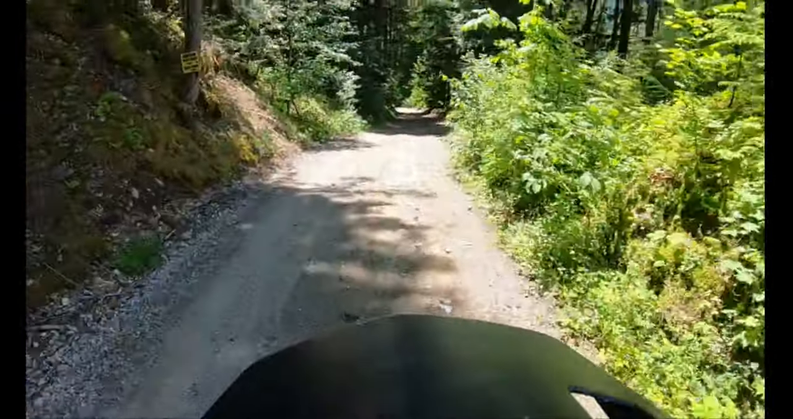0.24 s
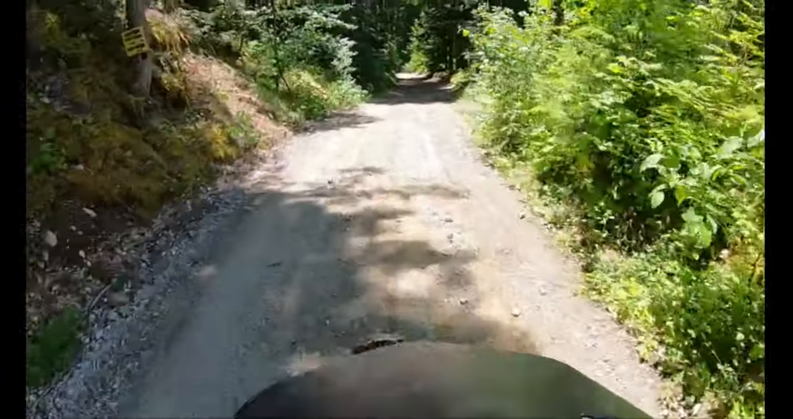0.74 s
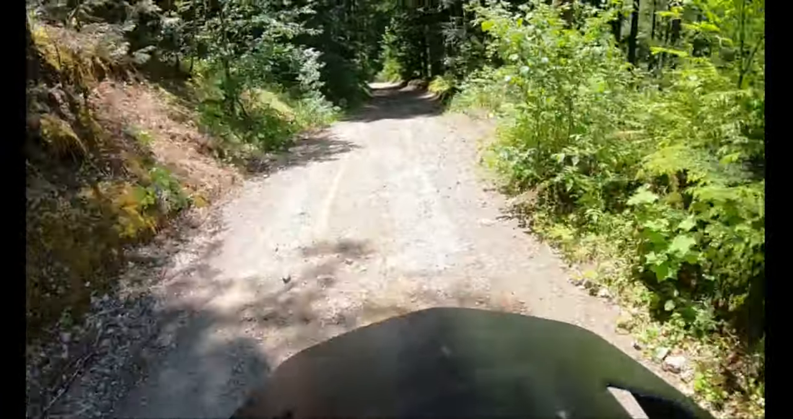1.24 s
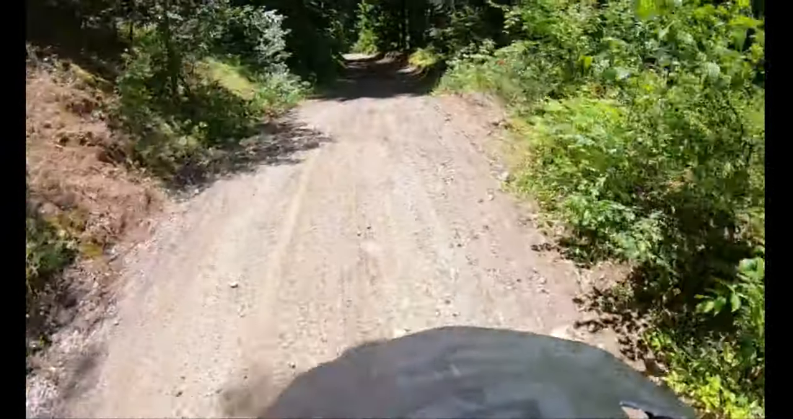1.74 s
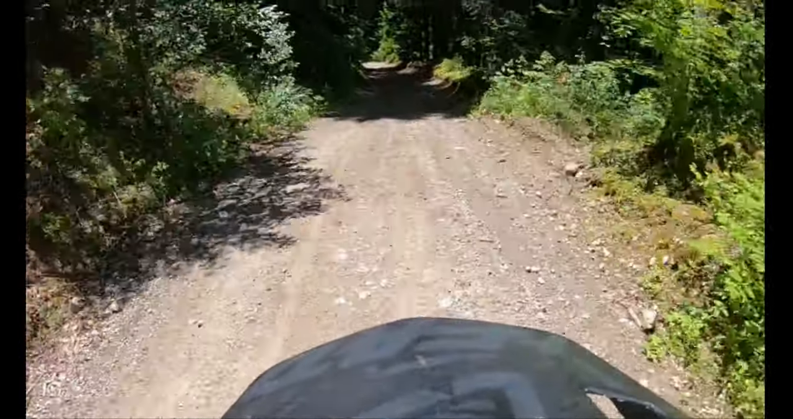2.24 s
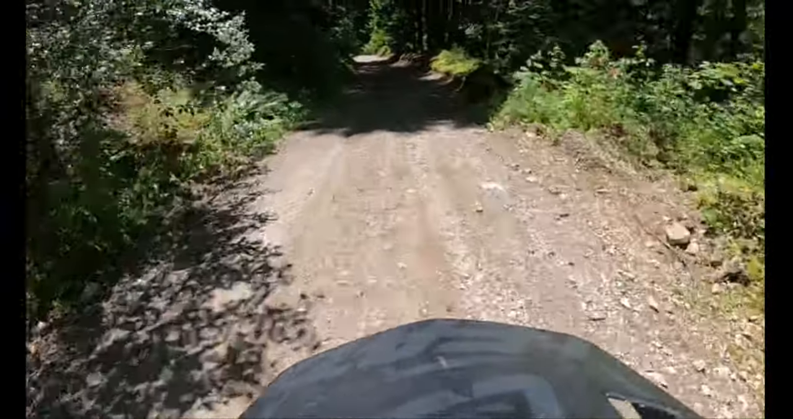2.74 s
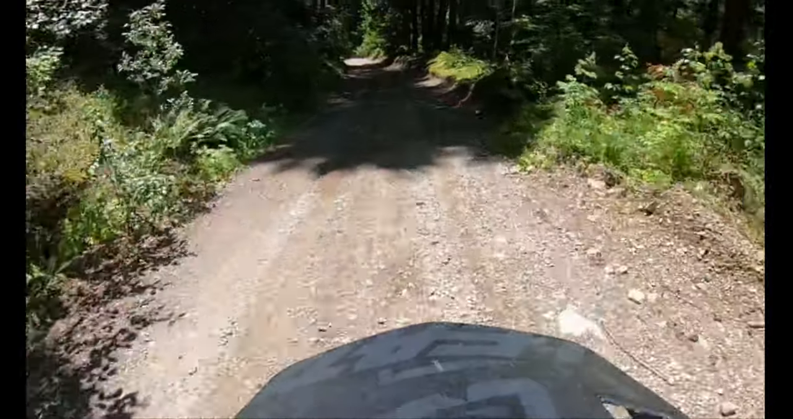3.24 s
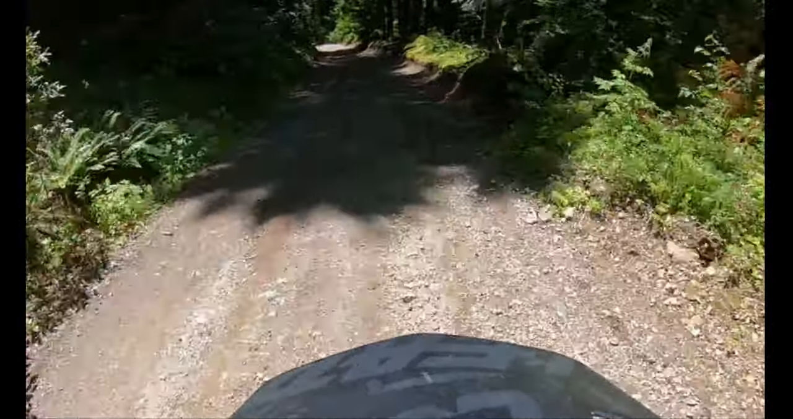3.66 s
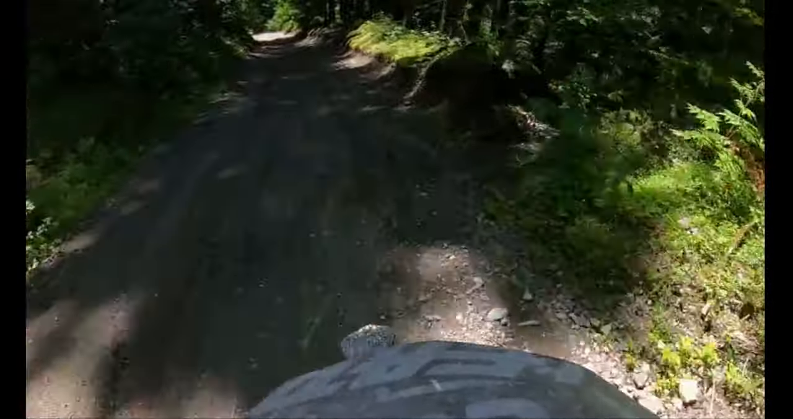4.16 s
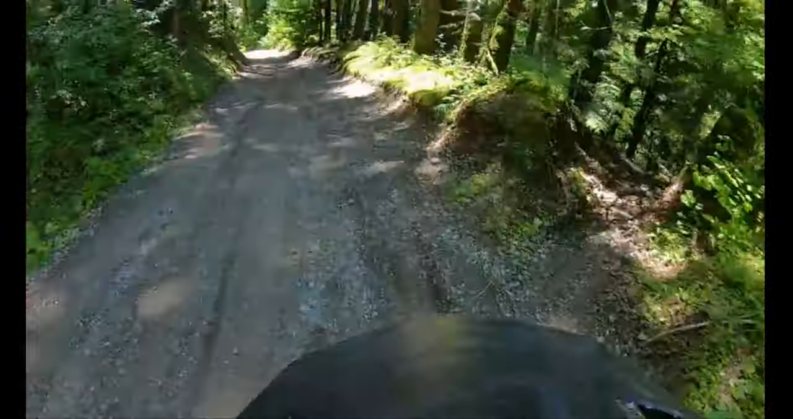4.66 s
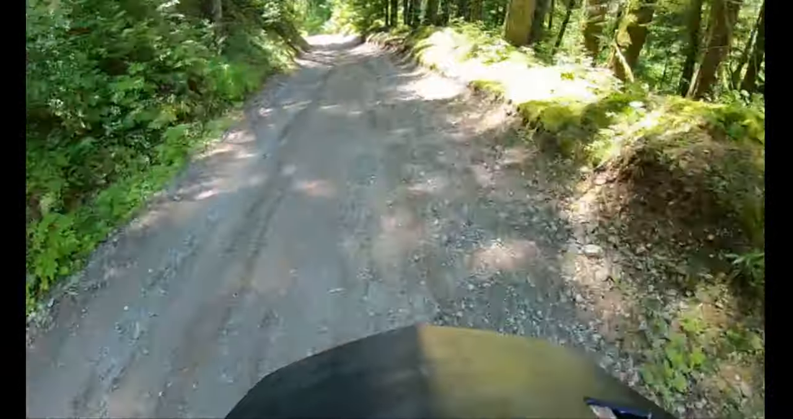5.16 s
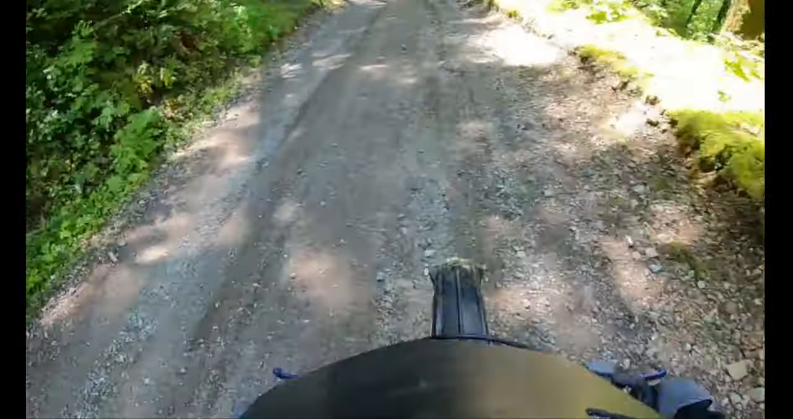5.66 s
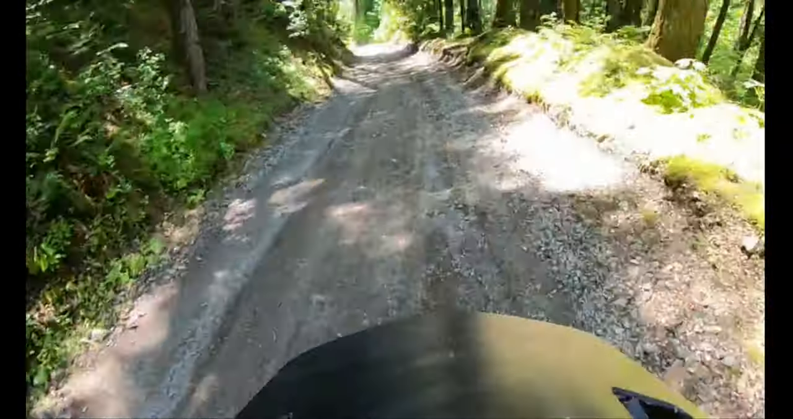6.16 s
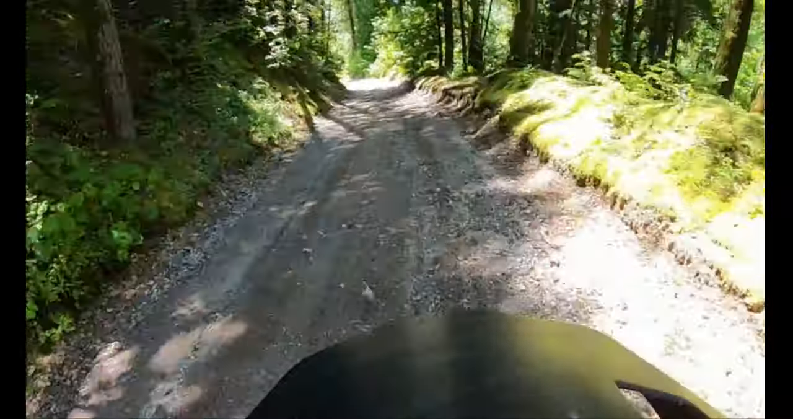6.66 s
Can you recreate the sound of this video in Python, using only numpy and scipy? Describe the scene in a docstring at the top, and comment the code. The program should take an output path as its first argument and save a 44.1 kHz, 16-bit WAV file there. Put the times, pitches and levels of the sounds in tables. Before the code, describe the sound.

Close at the rider's helmet, a dirt bike engine sputters and burbles on nearly shut throttle over crunching gravel, revs once briefly, then dies down.

```python
"""The single-cylinder engine of a dirt bike coasting down a gravel forest trail, heard at the rider's helmet.
Firings ring exhaust resonances over gliding crank multiples; on a nearly shut throttle strong ones come
only now and then, and one blip fires every turn and runs down. Clicks excite clattering metal modes.
Tyres scrub and crunch as coloured grain noise, stones and grit strike the bike and helmet, airbox and mudguard
resonate, low noise buffets as wind, and a narrow band of noise hisses faintly near the end."""
import sys
import numpy as np
from scipy import signal
from scipy.io import wavfile

SR = 44100
rng = np.random.default_rng(int(sys.argv[2]) if len(sys.argv) > 2 else 0)


def file_out(sig):
    """Save sig as 16-bit WAV at sys.argv[1]."""
    # one column per channel
    cols = np.atleast_2d(sig).T
    # limit, then scale
    lim = np.clip(cols, -1, 1)
    pcm = np.round(lim * 32767).astype(np.int16)
    wavfile.write(sys.argv[1], SR, pcm)


N = 304731
TIME = np.arange(N) / SR


def from_db(db):
    """Logarithmic level: 20 dB is a tenfold amplitude."""
    return 10 ** (np.asarray(db) / 20)


def rms_one(x):
    """Energy normalisation: scale to unit rms."""
    return x / np.sqrt(np.mean(x ** 2) + 1e-20)


def in_time(rows, at=TIME):
    """Linear interpolation: each column of a curve, read at the given times."""
    s, *columns = np.transpose(rows)
    return [np.interp(at, s, column) for column in columns]


def drift(rate):
    """Low-passed noise: a slow random wander about zero with unit rms, its bandwidth set by the rate [Hz]."""
    step = 40   # samples between the computed points
    pole = np.exp(-2 * np.pi * rate * step / SR)
    settle = 2000
    noise = rng.standard_normal(N // step + settle + 2)
    slow = signal.lfilter([1], [1, -2 * pole, pole * pole], noise)[settle:]
    return np.interp(np.arange(N) / step, np.arange(len(slow)), rms_one(slow))


def clicks(times, sizes):
    """Impulse train: one impulse for each time."""
    places = np.clip(np.round(times * SR).astype(int), 0, N - 1)
    return np.bincount(places, sizes, N) + 1e-18


def fade(x, decay_s):
    """First-order relaxation: each impulse becomes a dying exponential of the same height."""
    return signal.lfilter([1], [1, -np.exp(-1 / (decay_s * SR))], x)


def ring(x, hz, width):
    """Damped resonance: a unit impulse starts a decaying sine of initial height 1."""
    radius, angle = np.exp(-np.pi * width / SR), 2 * np.pi * hz / SR
    return signal.lfilter([0, np.sin(angle)], [1, -2 * radius * np.cos(angle), radius * radius], x)


def body(x, modes):
    """Modal superposition: parallel resonances of alternating sign."""
    return sum((-1) ** k * from_db(db) * ring(x, hz, width) for k, (hz, width, db) in enumerate(modes))


def butterworth(x, hz, kind="low"):
    """Second-order section filtering at the given edge or edges."""
    return signal.sosfilt(signal.butter(2, hz, kind, fs=SR, output="sos"), x)


def strike(times, level_db, modes, signs, vary_db, tune):
    """Modal impact: each blow rings every mode with its own strength, all modes shifted by its tuning."""
    hz, width, db = np.transpose(modes)[:, :, None]
    t = np.arange(SR // 10) / SR
    dying = from_db(db) * np.exp(-np.pi * width * t)
    scatter_db = vary_db[:, None] * rng.standard_normal((len(times), len(modes)))
    gains = signs * from_db(level_db[:, None] + scatter_db)
    starts = np.clip(np.round(times * SR).astype(int), 0, N)
    out = np.zeros(N + len(t))
    for start, gain, shift in zip(starts, gains, tune):
        out[start:start + len(t)] += gain @ (dying * np.sin(2 * np.pi * hz * shift * t))
    return out[:N]


def coloured(sources, spectrum, patchy_db):
    """Third-octave shaping: bands fed in turn by two sources, each flickering by itself; unit rms."""
    hz, db = np.transpose(spectrum)
    edges = 16 * 2 ** (np.arange(31) / 3)
    out = 0
    for k, (low, high) in enumerate(zip(edges, edges[1:])):
        centre = np.sqrt(low * high)
        if hz[0] <= centre <= hz[-1]:
            band = butterworth(sources[k % 2], [low, high], "band")
            band_db = np.interp(np.log(centre), np.log(hz), db)
            out = out + band * from_db(band_db + patchy_db * drift(20.0))
    return rms_one(out)


def grains(per_s, spread_db):
    """Shot noise: two independent streams of random clicks of uneven size, at unit rms together."""
    size_db = spread_db * np.minimum(rng.exponential(1, (2, N)), 5)
    sizes = from_db(size_db) * rng.choice([-1, 1], (2, N))
    return rms_one(sizes * (rng.random((2, N)) < per_s / SR))


def swell(s, half_s, db):
    """Gaussian envelope: gain peaks at one moment and falls to 1/e a half length either side."""
    return from_db(db) * np.exp(-((TIME - s) / half_s) ** 2)


def wavelet(t, hz, half_s):
    """Gaussian wave packet: a pressure trough with a few swings on either side."""
    return -np.cos(2 * np.pi * hz * t) * np.exp(-(t / half_s) ** 2)


# lone pops between misfires: (time [s], relative level [dB])
LONE_POPS = [(0.212, -7), (0.552, -6), (1.2136, -8), (1.3517, -14.5), (1.491, -17), (1.7318, -12),
             (1.85, -12.5), (2.025, -14), (2.1197, -12.5), (2.2363, -7), (3.53, -8.5), (4.03, -11),
             (4.284, -9), (4.4607, -9.5), (4.713, -12.5), (5.8572, -13.5), (5.979, -10)]
# the engine catches for evenly spaced firings: (first [s], last [s], firings [count], relative level [dB])
FIRING_RUNS = [(0.0006, 0.1123, 3, -7.3), (0.3603, 0.4325, 3, -4.5), (0.5962, 0.7908, 7, -4.8),
               (0.8995, 0.9572, 3, -3.8), (2.3464, 2.3774, 2, -11), (3.0257, 3.3172, 4, -11.5),
               (3.3716, 3.4761, 2, -9), (3.6425, 3.9452, 4, -7), (4.8824, 4.9418, 2, -12),
               (4.9995, 5.0645, 3, -4.6), (5.2132, 5.2432, 3, -4.3), (6.0708, 6.1766, 2, -13.5)]


def firings():
    """Intermittent combustion: time and level of the full firings, in runs or alone."""
    events = [(s, db) for s, db in LONE_POPS]
    for first_s, last_s, count, db in FIRING_RUNS:
        events += [(s, db) for s in np.linspace(first_s, last_s, round(count))]
    return np.transpose(sorted(events))


# the throttle is opened, eased off while held, then shut
BLIP_OPEN_S, BLIP_SHUT_S, BLIP_DB = 5.21, 5.55, -2
EASE_DB_PER_S, SHUT_DB_PER_S = 21, 83   # the second adds to the first


def blip(times):
    """Throttled combustion: burn level at once full, then sagging, then dying away."""
    held_db = BLIP_DB - EASE_DB_PER_S * (times - BLIP_OPEN_S)
    shut_db = SHUT_DB_PER_S * np.maximum(times - BLIP_SHUT_S, 0)
    return np.where(times < BLIP_OPEN_S, -np.inf, held_db - shut_db)


# crank rotation: (time [s], speed [turns/s])
CRANK_SPEED = [(0, 18), (.3, 20), (.65, 30), (1.05, 27.5), (1.25, 28), (1.42, 30), (1.65, 28.5),
               (2.0, 21.5), (2.28, 28), (2.7, 28.3), (3.0, 20.5), (3.65, 19), (4.15, 27.5), (4.38, 23),
               (4.62, 27), (4.9, 17), (5.04, 33), (5.2, 34), (5.34, 53), (5.55, 42.3), (5.8, 29),
               (6.05, 20), (6.91, 17)]
# mean strength of the lean burn on ordinary turns: (time [s], relative level [dB])
LEAN_BURN = [(0, -15), (1.0, -14.5), (1.6, -23), (2.0, -25.5), (2.3, -12), (2.9, -25.5), (3.5, -18),
             (4.05, -16), (4.9, -18), (5.9, -15), (6.4, -36), (6.91, -35)]
SPENT_DB = 7   # burn lost while the pipe's note sinks


def strokes():
    """Crank periodicity: time and burn of every turn, a whole number of turns between full firings."""
    turns = np.cumsum(in_time(CRANK_SPEED)[0]) / SR
    pop_s, pop_db = firings()
    marks = np.append(np.interp(pop_s, TIME, turns), turns[-1])
    counts = np.maximum(np.round(np.diff(marks)), 1).astype(int)
    spans = [np.linspace(a, b, n, endpoint=False) for a, b, n in zip(marks, marks[1:], counts)]
    times = np.interp(np.concatenate(spans), turns, TIME)
    lean_db = in_time(LEAN_BURN, times)[0] + 2.6 * rng.standard_normal(len(times))   # uneven burns
    spent = np.any([(times > first_s) & (times < last_s) for first_s, last_s, *_ in NOTE_SINKS], axis=0)
    burn_db = np.maximum(lean_db - SPENT_DB * spent, blip(times))
    burn_db[np.cumsum(counts) - counts] = pop_db
    return times, burn_db


# exhaust resonances rung by a firing: (frequency [Hz], width [Hz], relative level [dB])
PIPE_MODES = [(63, 100, -30), (105, 48, -24), (221.2, 81, 2.65), (291, 48.4, 1.83)]
# exhaust resonances when a lean burn sends little gas through: (frequency [Hz], width [Hz], relative level [dB])
LEAN_PIPE_MODES = [(63, 90, -28), (108, 48, -21.5), (237, 55, 0.5), (293, 47, -.5)]
# upper exhaust resonances rung by a hard firing: (frequency [Hz], width [Hz], relative level [dB])
BARK_MODES = [(444.5, 40, -16.5), (637, 58, -20.5), (798, 26, -27.5), (948, 66, -21), (1080, 110, -21.5),
              (1370, 140, -34.5), (1800, 150, -37), (2740, 87, -33.5)]
# silencer resonances hissed through by the jet: (frequency [Hz], width [Hz], relative level [dB])
SILENCER_MODES = [(487, 110, 4.5), (640, 63, -2.5), (1060, 100, -3), (1200, 73, -0.5), (1360, 98, -5)]
# hot gas raises the pipe's pitch as the throttle opens, then it sinks
BLIP_TUNE, TUNE_LOSS_PER_S = 1.1, 0.69   # shares of the usual pitch
# the suction after a firing
THUMP_HZ, THUMP_HALF_S, THUMP_DELAY_S, THUMP_DB = 165, 0.0013, 0.00492, -5.5


def exhaust(times, burn_db):
    """Impulsive excitation of a pipe: firings ring it; hard ones thump, bark, crackle and jet most."""
    count = len(times)
    speed, = in_time(CRANK_SPEED, times)
    lean, on_throttle = burn_db < -13, blip(times) >= burn_db
    weak = lean & ~on_throttle
    uneven = np.where(on_throttle, .25, np.where(lean, 1, .4))   # strong burns repeat closely
    late_s = 0.00097 * rng.standard_normal(count) * weak   # lean burns catch early or late
    hot_tune = BLIP_TUNE - TUNE_LOSS_PER_S * (times - BLIP_OPEN_S)
    tune = np.where(on_throttle, hot_tune, 1) * (1 + 0.066 * uneven * rng.standard_normal(count))

    signs = (-1) ** np.arange(len(PIPE_MODES))
    pops = 0
    for these, modes in ((~weak, PIPE_MODES), (weak, LEAN_PIPE_MODES)):
        pops = pops + from_db(2.5) * strike((times + late_s)[these], burn_db[these], modes, signs,
                                            vary_db=1.9 * uneven[these], tune=tune[these])

    # a faster crank snaps the port open harder
    hard_db = 1.3 * burn_db + 0.18 * (speed - 31)
    # the open throttle keeps the upper resonances ringing
    bark_db = np.where(on_throttle, burn_db - 5.0, hard_db + 0.5 - 5 * lean)
    # equal signs make all modes start together: a crack
    bark = strike(times, bark_db, BARK_MODES, -0.87, vary_db=2.7 * uneven, tune=np.ones(count))

    swing = wavelet(np.arange(SR // 20) / SR - THUMP_DELAY_S, THUMP_HZ, THUMP_HALF_S)
    thump_clicks = clicks(times, from_db(hard_db + THUMP_DB - 2.1 * on_throttle))
    thump = signal.fftconvolve(thump_clicks, swing)[:N]

    jet = fade(clicks(times, from_db(hard_db - 1.5 * on_throttle)), decay_s=0.009)
    rasp = jet * rms_one(body(grains(per_s=4400, spread_db=1.5)[0], SILENCER_MODES))
    spit = fade(clicks(times, from_db(bark_db)), decay_s=0.0025) * rng.standard_normal(N)
    crackle = from_db(-25.5) * butterworth(spit, [1200, 3800], "band")
    # low-pass [Hz]: the port takes a moment to open
    return butterworth(pops + bark + thump + from_db(-22.5) * rasp + crackle, 3000)


# gas pumped through the exhaust: (time [s], relative deep throb level [dB], relative drone level [dB])
GAS_PUFFS = [(0, -21.5, -8), (.5, -16.5, -31), (.7, -28, -24.5), (.9, -18, -23), (1.42, -22, -17),
             (1.72, -16.5, -19.5), (1.98, -23.5, -23.5), (2.17, -20.5, -16.5), (2.72, -20.5, -14.5),
             (2.95, -19.5, -27.5), (4.1, -19, -18), (4.68, -19, -24.5), (4.85, -25, -32), (5.14, -20, -23),
             (5.48, -27, -18), (5.7, -18.5, -21.5), (5.87, -20, -15.5), (6.3, -23, -23.5),
             (6.91, -26, -30.5)]
# firings above the threshold take the place of the puffs: losses in dB per dB
HARD_DB, THROB_LOSS, DRONE_LOSS = -9, 0.98, 0.98


def puffs(times, burn_db):
    """Harmonic synthesis of periodic flow: each turn puffs, as low crank multiples gliding with it."""
    turn_count = np.interp(TIME, np.append(times, TIME[-1]), np.arange(len(times) + 1))
    speed, = in_time(CRANK_SPEED)
    throb_db, drone_db = in_time(GAS_PUFFS)
    # a firing clears the pipe for its whole turn
    hard_db = np.interp(TIME - .5 / speed, times, np.maximum(burn_db - HARD_DB, 0))
    throb_db, drone_db = throb_db - THROB_LOSS * hard_db, drone_db - DRONE_LOSS * hard_db
    # near 28 turns a second the pipe favours the fourth multiple
    sharp_db = np.minimum(-8 + 1.3 * np.abs(speed - 28), 2)
    orders_db = [throb_db - 13.5,
                 throb_db - 6.0,
                 drone_db - 3.5 - np.clip(25 - speed, 0, 6),
                 drone_db + sharp_db - 8.5,
                 drone_db + sharp_db - 13.5]
    # the pressure trough follows the opening of the port by 4 ms
    suction = 2 * np.pi * (turn_count - speed * 0.004)
    out = 0
    for order, db in enumerate(orders_db, start=2):
        height = np.sqrt(2) * from_db(db - 1.5 + 2.03 * drift(12))
        out = out - height * np.cos(order * suction + 0.45 * drift(2.5))
    return out


# the ride: (time [s], relative engine clatter level [dB], relative gravel crunch level [dB])
RIDE_LEVELS = [(0, -52, -60.5), (.3, -50.5, -62.5), (1.3, -52.5, -64), (1.95, -47.5, -62),
               (2.3, -43.5, -59.5), (3.7, -46, -60.5), (4.12, -44.5, -57), (4.4, -47.5, -63.5),
               (4.8, -48.5, -62), (5.15, -45, -58.5), (6.05, -47.5, -65.5), (6.55, -57, -67),
               (6.91, -57, -64.5)]
# airbox, cylinder, fins and frame: (frequency [Hz], width [Hz], relative level [dB])
METAL_MODES = [(460, 160, -0.5), (648.5, 37, -1), (838, 86, 2), (925, 120, 2.5), (1194, 90, -1),
               (1390, 100, -3.5), (1758, 150, -2), (2158, 155, -1), (2363, 284, 1.5), (2766, 207, 0),
               (3530, 370, -5), (3757, 173, -8), (5480, 580, -12)]
# short knocks and rattles that ring the metal, many soft, some perhaps from gravel:
# (time [s], relative level [dB])
METAL_RATTLES = [(0.054, -29), (0.104, -27), (0.201, -28), (0.353, -26.5), (0.395, -33.5), (0.494, -31),
                 (0.586, -22), (0.889, -25), (0.924, -28), (1, -38), (1.832, -34), (1.923, -38),
                 (3.111, -32.5), (4.395, -40), (4.8053, -30), (4.9859, -24), (5.0339, -19), (5.062, -31),
                 (5.114, -30), (5.236, -30), (5.29, -27), (5.527, -34.5), (5.923, -36), (5.996, -39),
                 (6.06, -38), (6.56, -33), (6.688, -43)]
# the cooling fins ping at every slap
FIN_HZ, FIN_WIDTH_HZ, FIN_DB = 2781, 118, 4


def clatter(times, clatter_db):
    """Structure-borne modes: piston slap, chain chatter and short knocks and rattles ring the metal."""
    slap_s = times - .005   # the piston slaps before the port opens
    slap_db = -7.5 + 3.5 * rng.standard_normal(len(times))
    slap = fade(clicks(slap_s, from_db(slap_db)), decay_s=0.014)
    chatter = rms_one(body((1 + slap) * grains(per_s=3500, spread_db=2.5)[0], METAL_MODES))
    fin_db = FIN_DB + 3 * rng.standard_normal(len(times))
    fins = ring(clicks(slap_s, from_db(fin_db)), FIN_HZ, FIN_WIDTH_HZ)
    rattle_s, rattle_db = np.transpose(METAL_RATTLES)
    rattles = fade(clicks(rattle_s, from_db(rattle_db)), decay_s=0.0063) * rng.standard_normal(N)
    return from_db(clatter_db + 7.0) * (chatter + fins) + from_db(-24.0) * body(rattles, METAL_MODES)


# tyres scrubbing through loose dirt: (time [s], relative level [dB])
DIRT_SCRUB = [(0, -34.5), (.5, -35), (.7, -38.5), (1.0, -36.5), (1.55, -35), (1.97, -47), (2.55, -35.5),
              (2.95, -41), (3.75, -40.5), (4.2, -33), (4.8, -35.5), (4.93, -40), (5.15, -32), (5.45, -35.5),
              (5.9, -40), (6.91, -39.5)]
# colour of the scrub: (frequency [Hz], relative density per Hz [dB])
SCRUB_COLOUR = [(150, 2), (300, 5.5), (420, 2), (650, 0.5), (950, -2), (1300, -10), (1800, -13),
                (2800, -20.5), (4500, -42.5), (8000, -57.5)]
# colour of crushed gravel: (frequency [Hz], relative density per Hz [dB])
CRUNCH_COLOUR = [(1000, -4), (2000, 6), (3400, 6), (4400, 5), (5300, -3), (6500, -13), (7800, -6.5),
                 (8800, -12), (9800, -18), (11500, -33), (15000, -39.5)]


def tyres(scrub_db, crunch_db):
    """Granular contact noise: knobs scrub through the dirt and crush gravel in clumps."""
    clumps = drift(36)
    scrub_grains = grains(per_s=3000 * from_db(2.5 * clumps), spread_db=3.0)
    scrub = coloured(scrub_grains, SCRUB_COLOUR, patchy_db=2.5)
    crunch_grains = grains(per_s=6000 * from_db(1.9 * clumps), spread_db=1.0)
    crunch = coloured(crunch_grains, CRUNCH_COLOUR, patchy_db=1.5)
    return from_db(scrub_db + 3.5) * scrub + from_db(crunch_db + 7.5) * crunch


# colour of the buffeting: (frequency [Hz], relative density per Hz [dB])
WIND_COLOUR = [(15, -13), (28, -13), (45, -2.5), (75, -2), (120, -4), (170, -13), (260, -12.5),
               (400, -23.5), (900, -43.5)]


def wind():
    """Turbulent pressure noise: lumpy low buffeting round the helmet, swelling with the throb."""
    air = coloured(rng.standard_normal((2, N)), WIND_COLOUR, patchy_db=2.0)
    return from_db(in_time(GAS_PUFFS)[0] - 0.5) * air


# the mudguard: (frequency [Hz], width [Hz], relative level [dB])
MUDGUARD_MODES = [(630, 46, -0.5), (880, 75, 1.5), (1230, 90, -6.5), (1400, 98, -10)]
# a spell of grit against it
PATTER_S, PATTER_HALF_S, PATTER_DB = 0.17, .55, -37


def mudguard():
    """Panel resonance: grit thrown up by the front tyre patters on the mudguard, which rings hollow."""
    patter = rms_one(body(grains(per_s=800, spread_db=2.5)[0], MUDGUARD_MODES))
    return swell(PATTER_S, PATTER_HALF_S, PATTER_DB) * patter


# cooling gas lowers the pipe's note turn by turn:
# (first [s], last [s], first frequency [Hz], last frequency [Hz], peak level [dB])
NOTE_SINKS = [(0.23, 0.348, 150, 110, -14), (0.45, 0.551, 141, 97, -10), (0.797, 0.885, 144, 113, -14.5),
              (1.466, 1.61, 94, 55.3, -19), (5.083, 5.206, 169, 116, -13), (5.6, 5.823, 175, 94.5, -18)]


def sinking(times):
    """Temperature-dependent resonance: each turn swings the cooling gas at a lower note than the last."""
    out, delay_s, half_cycles = np.zeros(N), .0042, 1.15
    for first_s, last_s, first_hz, last_hz, db in NOTE_SINKS:
        for s in times[(times > first_s) & (times < last_s)]:
            hz = np.interp(s, [first_s, last_s], [first_hz, last_hz])
            near = slice(int(s * SR) - SR // 20, int(s * SR) + SR // 20)
            out[near] += from_db(db) * wavelet(TIME[near] - s - delay_s, hz, half_cycles / hz)
    return out


# stones flicked against the bike: (time [s], relative level [dB])
STONE_HITS = [(0.3554, -61), (0.5916, -59), (2.0657, -55), (3.1428, -54), (4.0636, -47), (4.334, -53),
              (4.9926, -50), (5.236, -54)]
# ring of a stone hit: (frequency [Hz], width [Hz], relative level [dB])
STONE_MODES = [(3300, 700, -1), (4580, 320, 0.5), (5500, 410, -7.5), (7600, 770, -10), (9600, 900, -19)]


def stones():
    """Repeated impact excitation: a stone skitters over the bike in a quick burst of ticks."""
    times, level_db = np.transpose(STONE_HITS)
    burst = fade(clicks(times, from_db(level_db)), decay_s=0.0089)
    ticks = burst * grains(per_s=5500, spread_db=-1.5)[0]
    return from_db(-7.5) * body(ticks, STONE_MODES)


# chips of grit snap off the helmet: (time [s], relative level [dB])
GRIT_CHIPS = [(0.8909, -54), (2.0657, -47), (2.3531, -53), (2.62, -43), (2.8021, -52), (3.39, -48),
              (3.491, -52), (4.0632, -43), (5.1228, -52)]
# colour of the snap: (frequency [Hz], relative density per Hz [dB])
CHIP_COLOUR = [(3500, -9), (5000, 0.5), (6500, 0.5), (8000, -1), (10000, -8.5), (12000, -22.5)]


def chips():
    """Brief broadband impact: a chip of grit gives one dry, bright tick of fading noise."""
    times, level_db = np.transpose(GRIT_CHIPS)
    snap = fade(clicks(times, from_db(level_db - 7.5)), decay_s=0.0028)
    return snap * coloured(rng.standard_normal((2, N)), CHIP_COLOUR, patchy_db=0)


# brief rough surges: tyres in loose patches, and a rasping buzz in the blip:
# (time [s], half length [s], relative level [dB])
ROUGH_SURGES = [(1.7, 0.1, -33.5), (2.557, 0.035, -34.5), (3.174, 0.062, -32), (3.406, 0.055, -37.5),
                (4.201, 0.019, -35), (4.393, 0.12, -31.5), (5.298, 0.035, -34.5), (6.233, 0.085, -42)]
# colour of the surges: (frequency [Hz], relative density per Hz [dB])
SURGE_COLOUR = [(200, 0), (450, 2.5), (700, 3), (950, 2.5), (1300, -3.5), (1800, -10), (2800, -18),
                (4500, -36.5), (8000, -54)]


def rough_surges():
    """Amplitude-modulated shot noise: lumpy surges of tyres in loose patches, and a buzz in the blip."""
    lumps = from_db(2.5 * np.clip(drift(60), -2, 1.5))
    rough = coloured(grains(per_s=1600, spread_db=2.0), SURGE_COLOUR, patchy_db=1.5)
    surge = sum(swell(s, half_s, db) for s, half_s, db in ROUGH_SURGES)
    return from_db(3.0) * surge * rms_one(lumps * rough)


# the airbox, rung by each gulp of air: (frequency [Hz], width [Hz], relative level [dB])
AIRBOX_MODES = [(467, 64, -5), (661, 24, 1), (1030, 150, -5), (1220, 90, -3)]
# swell of the gulps round the blip
GULP_S, GULP_HALF_S, GULP_DB = 5.56, 0.43, -30.5


def intake(times):
    """Periodically driven cavity: equal gulps make the airbox sing upper multiples of the crank speed."""
    gulps = swell(GULP_S, GULP_HALF_S, GULP_DB) * clicks(times, np.ones(len(times)))
    return -sum(from_db(db) * ring(gulps, hz, width) for hz, width, db in AIRBOX_MODES)


# a thin hiss swells and fades as the bike slows; the width is that of each of two resonances
HISS_S, HISS_HALF_S, HISS_DB = 5.97, .28, -71
HISS_HZ, HISS_WIDTH_HZ = 7500, 900


def hiss():
    """Band-limited noise: two resonances in series leave a faint, narrow hiss."""
    once = ring(rng.standard_normal(N), HISS_HZ, HISS_WIDTH_HZ)
    band = ring(once, HISS_HZ, HISS_WIDTH_HZ)
    return swell(HISS_S, HISS_HALF_S, HISS_DB) * rms_one(band)


def scene():
    """Linear superposition: engine, trail and air, all close to the helmet."""
    times, burn_db = strokes()
    clatter_db, crunch_db = in_time(RIDE_LEVELS)
    scrub_db, = in_time(DIRT_SCRUB)
    engine = exhaust(times, burn_db) + puffs(times, burn_db) + clatter(times, clatter_db)
    engine = engine + sinking(times) + intake(times)
    trail = tyres(scrub_db, crunch_db) + mudguard() + stones() + chips()
    return (engine + trail + rough_surges() + wind() + hiss())[None]


def record(dry):
    """Band limiting and saturation: the deepest rumble is cut, peaks are rounded, the top is cut."""
    ceiling, low_cut_hz, cutoff_hz = 1.1, 18, 15700
    heard = butterworth(dry, low_cut_hz, "high")
    rounded = ceiling * np.tanh(heard / ceiling)
    return signal.sosfilt(signal.cheby2(12, 70, cutoff_hz, fs=SR, output="sos"), rounded)


dry = scene()
out = record(dry)
file_out(out)
```